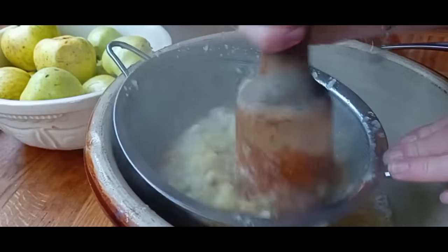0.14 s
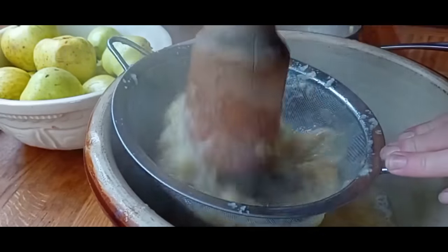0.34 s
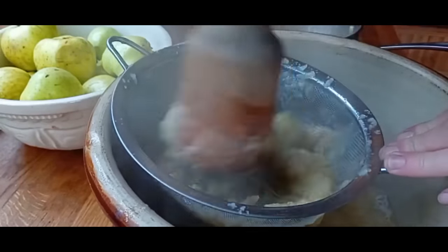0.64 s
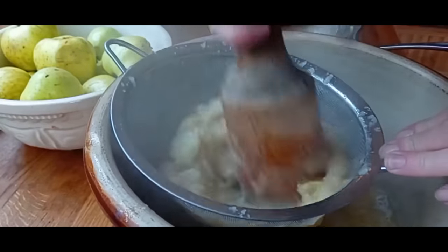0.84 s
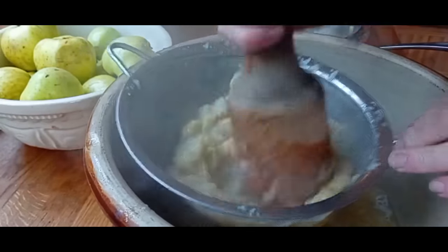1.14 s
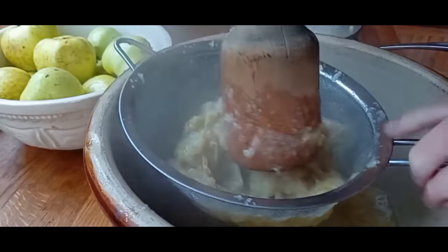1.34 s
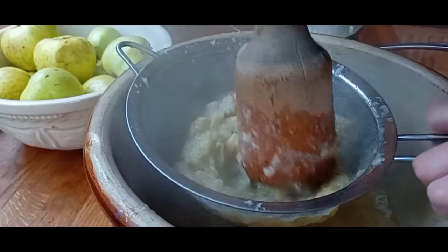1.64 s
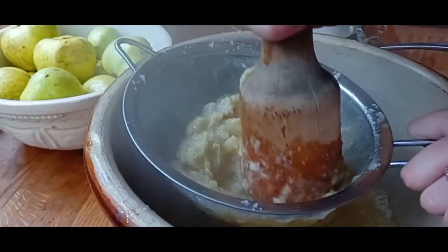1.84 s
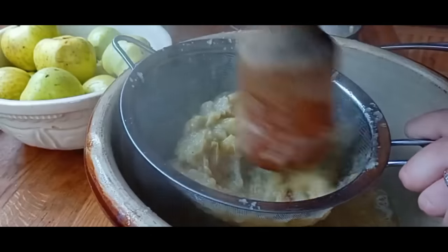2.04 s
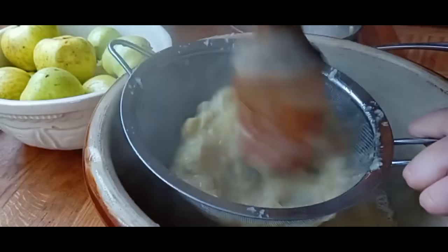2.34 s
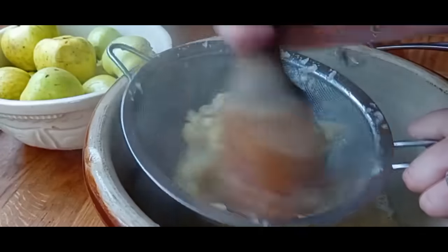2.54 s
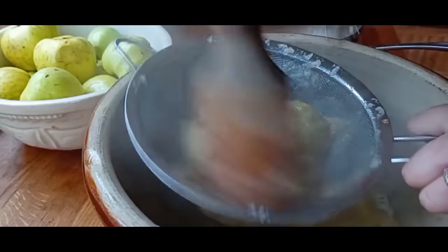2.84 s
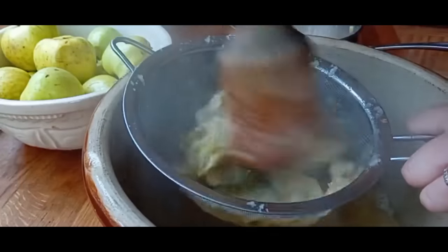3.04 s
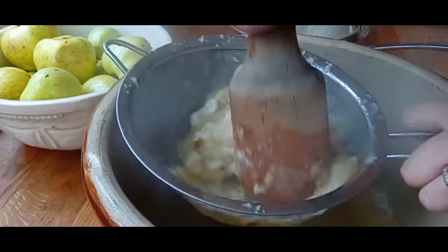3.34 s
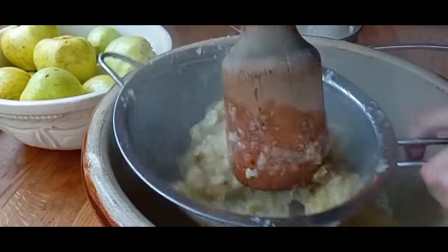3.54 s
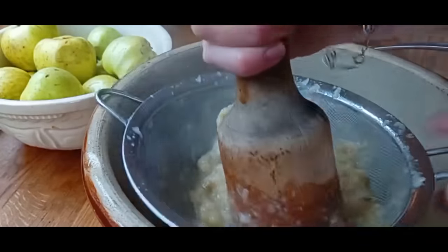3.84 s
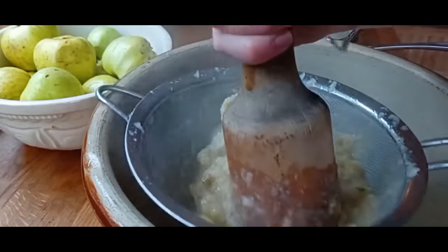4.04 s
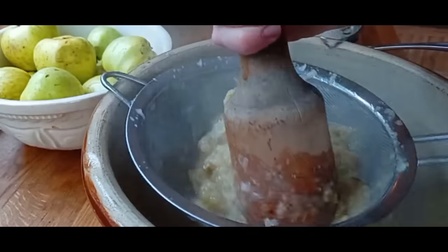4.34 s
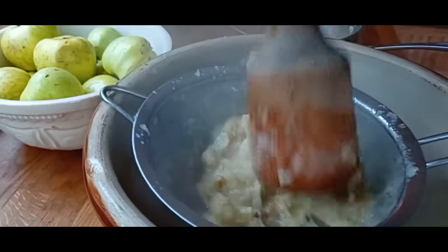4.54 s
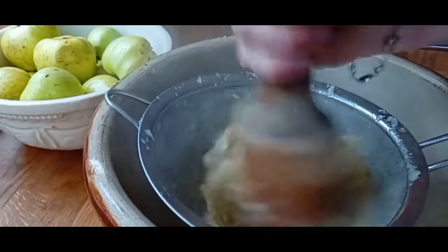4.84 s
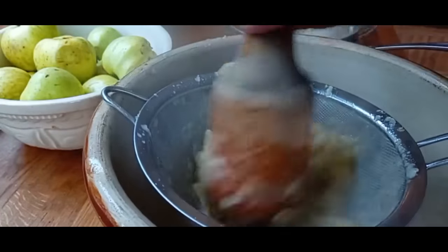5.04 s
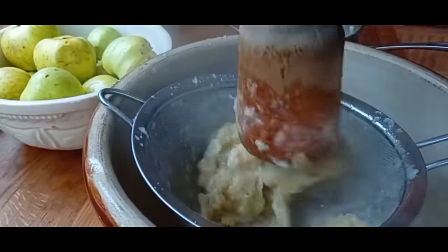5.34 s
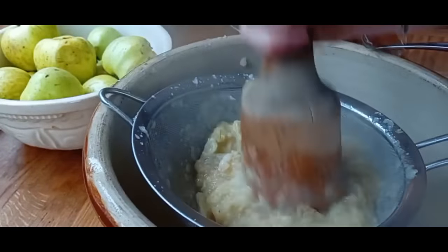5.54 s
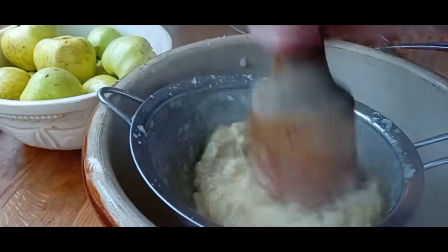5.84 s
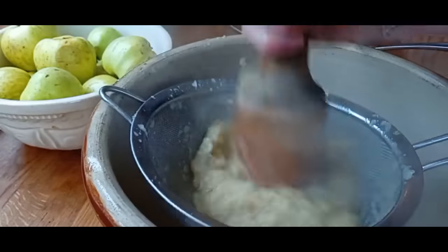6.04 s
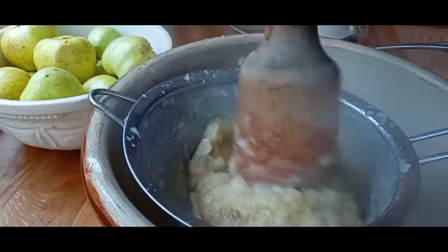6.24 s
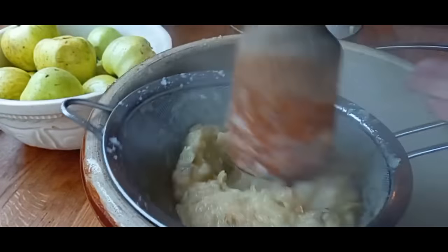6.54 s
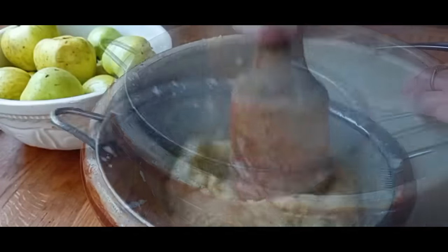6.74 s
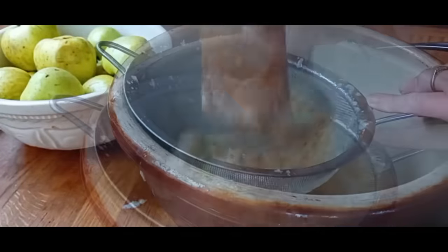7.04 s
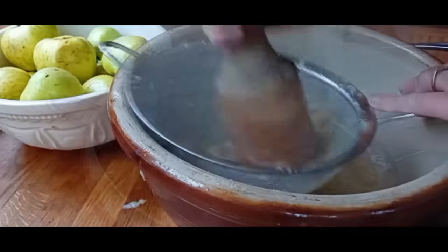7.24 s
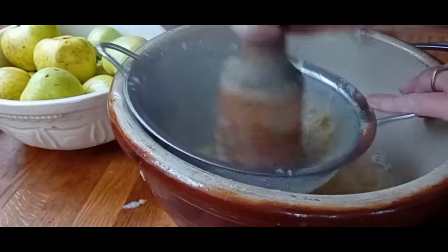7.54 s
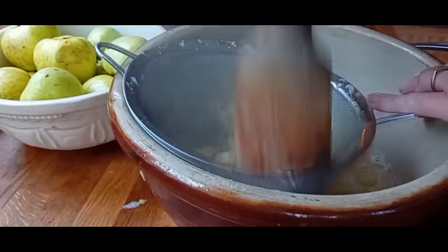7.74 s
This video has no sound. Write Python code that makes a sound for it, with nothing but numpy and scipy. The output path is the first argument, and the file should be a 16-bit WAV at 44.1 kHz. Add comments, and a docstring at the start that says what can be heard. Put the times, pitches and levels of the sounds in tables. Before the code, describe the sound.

A wooden beater mashes wet fruit pulp through a wire sieve, rasping and squishing, with metal taps against a bowl.

```python
"""A wooden beater mashes cooked apple through a wire sieve resting in a big earthenware bowl, in a kitchen.
It starts lightly, pressing and dragging: wood rasps on ringing mesh, air pockets pop and spit, and pulp
squishes in the hollow bowl. After a lull, harder presses come from 2.2 s. Around 4 s the frame grates
and knocks on the rim, and at 4.5 s a shove makes the sieve judder. The work goes on at about three
presses a second and ends on two heavy, juddering pushes."""
import sys
import numpy as np
from scipy import signal
from scipy.io import wavfile

SR = 44100
rng = np.random.default_rng(int(sys.argv[2]) if len(sys.argv) > 2 else 0)


def transcribe(u):
    """Save the signal u as a 16-bit wav file named by the first command-line argument.

    u: samples, shape (n,) or (channels, n), limited to [-1, 1]; the rate is SR.
    q: integer samples, one column per channel.
    """
    v = np.clip(np.atleast_2d(u).T, -1, 1)
    q = np.round(v * 32767).astype(np.int16)
    wavfile.write(sys.argv[1], SR, q)


N = 347943


def from_db(db):
    """Decibels to gain."""
    return 10 ** (np.asarray(db) / 20)


def rms_one(x):
    """Scale to rms 1."""
    return x / np.sqrt(np.mean(x ** 2) + 1e-20)


def at_hz(points, hz):
    """Read a curve on a log-frequency axis."""
    freqs, values = np.transpose(points)
    return np.interp(np.log(hz), np.log(freqs), values)


def passband(x, hz, kind):
    """Second-order Butterworth filter."""
    sos = signal.butter(2, np.clip(hz, 10, SR * .45), kind, fs=SR, output="sos")
    return signal.sosfilt(sos, x + 1e-18)


def bands(low_hz, high_hz):
    """Edges of roughly third-octave bands."""
    edges = np.geomspace(low_hz, high_hz, int(3 * np.log2(high_hz / low_hz)) + 2)
    return zip(edges, edges[1:])


def wander(per_s):
    """Random modulator: glides between values of spread 1."""
    return np.interp(np.arange(N) * per_s / SR, np.arange(3000), rng.standard_normal(3000))


def control_times():
    """Envelope clock, ticking about once a millisecond."""
    return np.linspace(0, N / SR, 8000)


def per_sample(envelope):
    """Bring an envelope up to audio rate."""
    return np.interp(np.arange(N) / SR, control_times(), envelope)


def push_envelope(s, hold_s, rise, sag, release):
    """A push bites fast, eases as the load gives way, then is let go; slopes in dB per second."""
    t = control_times() - s
    db = rise * np.minimum(t, 0) - sag * np.clip(t, 0, hold_s) - release * np.maximum(t - hold_s, 0)
    return from_db(np.maximum(db, -200))


def drag_envelope(s, half_s):
    """A drag swells to a rounded top and falls away."""
    distance = (control_times() - s) / max(half_s, .004)
    return np.exp(1 - np.minimum(np.hypot(1, distance) ** 1.15, 25))


def grains(per_s, spread_db):
    """Tiny random contacts of uneven size, on two channels with strengths of their own."""
    sizes = from_db(spread_db * np.minimum(rng.exponential(1, N), 4))
    return (rng.random(N) < per_s / SR) * sizes * rng.standard_normal((2, N))


# Stereo image of scattered sound: f/Hz, left-right correlation
LIKENESS = [(60, 0.76), (200, 0.96), (400, 0.24), (900, 0.5), (1700, 0.18), (2400, -0.25), (3500, -0.19),
            (16000, 0.067)]
def stereo_band(pair, low, high):
    """One band of two unrelated signals, mixed as mid and side to the width of scattered sound."""
    mid, side = passband(pair, [low, high], "band")
    alike = at_hz(LIKENESS, np.sqrt(low * high))
    return np.sqrt(1 + alike) * mid + np.sqrt(1 - alike) * side * np.array([[1], [-1]])


def texture(excite, spectrum, patchy_db=0):
    """Two excitations feed alternate bands of an EQ curve, each flickering by patchy_db; rms 1."""
    pairs = excite(), excite()
    out = 0
    for k, (low, high) in enumerate(bands(spectrum[0][0], spectrum[-1][0])):
        gain = from_db(at_hz(spectrum, np.sqrt(low * high)) + patchy_db * wander(per_s=68))
        out += gain * stereo_band(pairs[k % 2], low, high)
    return rms_one(out)


def ring(x, modes, shifting_db):
    """Resonator bank: a body's modes, each with a drifting drive and its own left-right phase."""
    out = np.zeros((2, N))
    for hz, db, t60, phase in modes:
        radius = from_db(-60 / (t60 * SR))
        pole = radius * np.exp(2j * np.pi * hz / SR)
        drive = x * from_db(db + shifting_db * wander(per_s=8.5)) + 1e-18
        swing = signal.lfilter([np.sqrt(1 - radius ** 2)], [1, -pole], drive)
        out += [swing.imag, (swing * np.exp(-1j * phase)).imag]
    return out


# Low room resonances: f/Hz, level/dB, t60/s, left-right phase/rad
ROOM_MODES = [(97, -9, 0.13, 0.094), (118.3, 0, 0.092, 0.091), (210.5, -2, 0.91, 0.18),
              (289.4, -3.5, 1, 0.12)]
# EQ of the room's hiss: f/Hz, level/dB
HISS_EQ = [(30, -26.5), (60, -13), (100, -2), (170, -8.5), (290, -14), (450, -20), (1000, -28.5),
           (3000, -30), (7000, -34), (12000, -31.5), (16000, -26)]
def room_tone(drone_db=-66, hiss_db=-63, whine_db=-75, whine_hz=15472):
    """The bed: a wavering drone of faintly stirred room modes, a thin whine and soft hiss."""
    drone = ring(rng.standard_normal(N), ROOM_MODES, shifting_db=2.5)
    drone = rms_one(passband(drone, 82, "high"))
    whine = rms_one(np.sin(2 * np.pi * whine_hz * np.arange(N) / SR))
    hiss = texture(lambda: rng.standard_normal((2, N)), HISS_EQ)
    return from_db(drone_db) * drone + from_db(whine_db) * whine + from_db(hiss_db) * hiss


# Reverb time of the kitchen: f/Hz, t60/s
KITCHEN_DECAY = [(150, 0.28), (500, 0.24), (1400, 0.18), (3700, 0.19), (10000, 0.15), (16000, 0.018)]
def reflections(x, t60s=KITCHEN_DECAY, predelay_s=.0053, size=22000):
    """Dense echoes that die away band by band; the kitchen's by default."""
    t = np.arange(size) / SR
    white = rng.standard_normal((2, 2, size)) * (t > predelay_s)
    tail = sum(stereo_band(white[k % 2], low, high) * from_db(-60 * t / at_hz(t60s, low))
               for k, (low, high) in enumerate(bands(100, 17000)))
    return signal.oaconvolve(x, rms_one(tail) / np.sqrt(size), axes=1)[:, :N]


# Low swells: centre t/s, half length/s, f/Hz, level/dB
HUMS = [(0.193, 0.011, 200, -62), (1.912, 0.026, 100, -55), (2.006, 0.014, 96.5, -50),
        (2.482, 0.012, 290, -48.5), (3.143, 0.015, 289, -46.5), (3.35, 0.013, 108, -44.5),
        (3.578, 0.021, 106, -51), (3.74, 0.0084, 130, -46), (4.193, 0.035, 97, -52.5),
        (4.576, 0.019, 210, -47), (4.719, 0.026, 102, -47), (5.214, 0.011, 212, -50.5),
        (5.52, 0.028, 217, -48), (6.116, 0.048, 97, -57), (5.775, 0.011, 477, -42),
        (6.161, 0.017, 471, -44.5)]
def hums(size=4000):
    """Bowl and table hum in brief, low notes that swell and fade."""
    t = np.arange(-size, size) / SR
    out = np.zeros(N + 2 * size)
    for s, half_s, hz, db in HUMS:
        start = int(s * SR)
        swell = from_db(db) * np.exp(-.5 * (t / half_s) ** 2)
        out[start:start + 2 * size] += swell * np.sin(2 * np.pi * (hz * t + rng.random()))
    return np.sqrt(2) * out[size:-size]


# Hard pushes on the rim: t/s, hold/s, level/dB
SHOVES = [(2.609, .005, -48.5), (2.726, 0.014, -43), (2.936, 0.018, -44.5), (3.061, 0.031, -47),
          (3.278, 0.058, -49.5), (4.493, 0.064, -25.5), (4.704, 0.063, -67), (5.49, 0.08, -47.5),
          (6.882, 0.028, -46.5), (6.942, 0.078, -43.5), (7.218, 0.095, -42), (7.468, 0.091, -31.5),
          (7.809, .08, -34)]
# EQ of the judder's rumble: f/Hz, level/dB
JUDDER_EQ = [(30, -33), (60, -10.5), (110, 3), (170, 4.5), (230, 2.5), (310, 0), (420, -18)]
def judder(squeeze, rumble_db=-2, throb_db=-6, slip_hz=190, unsteady=.27, squeeze_db=-26):
    """The loaded sieve sticks and slips on the rim in an uneven rhythm, shaking bowl and table."""
    shoves = sum(from_db(db) * push_envelope(s, hold_s, rise=2794, sag=42.5, release=390)
                 for s, hold_s, db in SHOVES)
    load = from_db(squeeze_db) * squeeze + per_sample(shoves)
    slip_rate = slip_hz * np.exp(unsteady * wander(per_s=90))
    throb = np.sin(2 * np.pi * np.cumsum(slip_rate) / SR)
    rumble = texture(lambda: grains(per_s=2100, spread_db=-6), JUDDER_EQ)
    return load * (from_db(throb_db) * throb + from_db(rumble_db) * rumble)


# Air modes of the bowl: f/Hz, level/dB, t60/s, left-right phase/rad
BOWL_MODES = [(295, -4, .22, .2), (335, -7, .14, .4), (372, -2, .15, .3), (460, -1.5, .11, .3),
              (500, -5, .1, .4), (590, -3.5, .09, .3), (775, -9, .07, .5), (908, -2, .1, .4),
              (1015, -8, .07, .5)]
def bowl_hollow(x):
    """The air in the bowl resonates and gives the wet sounds a hollow body."""
    return ring(x.mean(axis=0), BOWL_MODES, shifting_db=5)


# Modes of frame and basket: f/Hz, level/dB, t60/s, left-right phase/rad
SIEVE_MODES = [(1249, -6, .12, .3), (1320, -11, .06, .3), (1416, -9, .08, .3), (1917, -8, .04, 1.2),
               (2310, 7, .09, 2.8), (2365, 5, .06, 2.9), (2450, 5.5, .07, 2.6), (2850, -9, .04, 1.2),
               (3575, -.5, .08, 2.0), (3640, -3.5, .04, 2.0), (4870, -6, .05, -1.5), (5460, -4, .05, 1.5),
               (5690, -3.5, .045, 1.0), (6090, -4.5, .05, -1.0), (6750, -3, .04, 1.5)]
# Automation of the rubbed sieve's middle modes: t/s, level/dB
MIDDLE_RING = [(0.3, 6), (2.7, 9), (3.5, 5.5), (3.9, -3), (4.17, 0), (4.4, 3), (7.0, 1.5)]
def rubbed_sieve(force):
    """Rubbing rings the sieve's modes, more or less as the contact point moves."""
    middle_gain = from_db(np.interp(np.arange(N) / SR, *np.transpose(MIDDLE_RING)))
    drive = force + (middle_gain - 1) * passband(force, [3200, 4050], "band")
    return ring(drive, SIEVE_MODES, shifting_db=4.5)


# Frame hits on the rim: t/s, then level/dB of the low, middle and high modes
KNOCKS = [(0.505, -39.5, -37, -56), (1.2632, -37.5, -35, -36), (1.395, -48.5, -47, -53),
          (1.501, -41.5, -47, -43.5), (1.517, -52, -59, -55), (1.673, -50.5, -68, -82),
          (1.8022, -39, -48, -43), (2.357, -34, -32, -39), (3.707, -31, -40, -37), (3.827, -31, -26, -36),
          (3.834, -43, -48, -41), (3.892, -42, -26, -44), (4.176, -37, -50, -49),
          (4.493, -33.5, -30, -30.5), (4.519, -41, -44, -39), (6.879, -45, -41, -45),
          (6.9376, -37, -35, -37.5), (7.02, -40, -44, -47), (7.379, -49, -50, -54)]
KNOCK_BANDS_HZ = 2850, 3600, 4800
def knocks(knock_db=3, click_db=-5, contact_s=.00038, choke_s=.0039, tail_db=-12, size=7000):
    """Steel clicks on glaze; hand and pulp choke the modes to a faint ring, detuned on each hit."""
    out, t = np.zeros((2, N + size)), np.arange(size) / SR
    attack, choke = 1 - np.exp(-t / contact_s), np.exp(-t / choke_s)
    for s, *levels in KNOCKS:
        colour = list(zip(KNOCK_BANDS_HZ, levels))
        click = 2 * passband(rng.standard_normal((2, size)) * choke, [900, 7000], "band")
        clank = from_db(click_db + levels[0]) * click
        for hz, db, t60, phase in SIEVE_MODES:
            detune, turn, linger = rng.standard_normal(3)
            fade = choke + from_db(tail_db + 2 * linger - 60 * t / t60)
            angle = 2 * np.pi * (hz * (1 + .006 * detune) * t + turn)
            clank += from_db(db + at_hz(colour, hz)) * fade * np.sin([angle, angle - phase])
        start = int(s * SR)
        out[:, start:start + size] += clank * attack
    return from_db(knock_db) * out[:, :N]


def basket_flex(ringing, flex_s=.000024, chatter_db=2.5):
    """The basket flexes and chatters under the beater, so its ring wavers in pitch and level."""
    n = np.arange(N)
    bent = n + flex_s * SR * wander(per_s=70)
    chatter = rms_one(from_db(chatter_db * wander(per_s=170)))
    return np.array([np.interp(bent, n, side) for side in ringing]) * chatter


# The beater comes down or bumps the sieve: t/s, hold/s, then level/dB of rasp, fizz and squish
PRESSES = [(0.158, .018, -39.5, -45, -56), (0.513, .08, -45, -58.5, -52.5), (0.804, .032, -37, -41.5, -40),
           (1.094, .1, -42, -44.5, -52), (1.257, .019, -44, -58, -41.5), (1.501, .015, -54.5, -74.5, -45),
           (2.224, 0.16, -32.5, -39, -33.5), (2.34, .035, -38.5, -45, -34),
           (2.559, 0.032, -39.5, -43, -41.5), (2.679, .12, -33.5, -41.5, -30),
           (2.898, 0.024, -34.5, -39.5, -35.5), (3.046, .013, -40.5, -49, -30.5),
           (3.243, .014, -35.5, -38, -43.5), (3.394, .003, -47, -66.5, -53), (4.494, .15, -34, -46, -34.5),
           (4.857, 0.054, -36, -38.5, -51), (5.171, .05, -34.5, -39.5, -39),
           (5.434, .064, -37.5, -46.5, -39.5), (5.737, .031, -34.5, -43.5, -40),
           (6.043, .18, -33, -41, -45.5), (6.362, .045, -34, -40, -26), (6.69, 0.18, -36.5, -43, -45.5),
           (6.939, .13, -41, -49.5, -37.5), (7.153, .19, -41, -53.5, -36),
           (7.194, .029, -32.5, -39.5, -33.5), (7.469, .17, -32.5, -35, -27),
           (7.799, .063, -31, -44, -29.5)]
# It is dragged round: centre t/s, half length/s, then level/dB of scrape, fizz and squish
DRAGS = [(0.224, 0.032, -40, -63.5, -46), (0.48, 0.012, -47, -58.5, -56), (0.561, 0.015, -61, -56, -49),
         (0.648, 0.068, -58, -62, -93), (0.883, 0.025, -47.5, -63, -52), (1.191, 0.035, -41.5, -62, -42),
         (2.034, 0.02, -58.5, -74, -56.5), (2.349, 0.016, -38, -45, -32), (2.7, 0.045, -34, -46.5, -42.5),
         (2.99, 0.049, -36, -54, -40.5), (3.351, 0.012, -31, -47.5, -35), (3.603, 0.045, -46.5, -59.5, -40),
         (3.822, 0.033, -28, -41.5, -35.5), (4.164, 0.042, -41.5, -58.5, -43.5),
         (4.313, 0.024, -45, -60, -57), (4.402, 0.033, -48, -71, -41), (4.952, 0.05, -52.5, -57, -79.5),
         (5.16, 0.01, -43, -59.5, -61), (5.27, 0.025, -46.5, -55, -54), (5.562, 0.025, -47, -58.5, -47.5),
         (5.854, 0.024, -47, -57, -49.5), (6.491, 0.045, -36.5, -46, -45.5),
         (6.659, 0.039, -44.5, -61, -49.5), (6.797, 0.01, -28, -46, -33), (6.846, 0.024, -33, -45, -34.5),
         (7.033, 0.012, -39.5, -43, -38), (7.324, 0.021, -34.5, -44.5, -47),
         (7.628, 0.011, -44.5, -44, -59)]
def beater_strokes():
    """Envelopes of rasp, fizz and squish; presses drive all three, drags add power to the last two."""
    presses = [push_envelope(s, hold_s, rise=2206, sag=155, release=399) for s, hold_s, *_ in PRESSES]
    drags = [drag_envelope(s, half_s) for s, half_s, *_ in DRAGS]
    power = from_db([row[2:] for row in PRESSES]).T ** 2 @ np.square(presses)
    power[1:] += from_db([row[3:] for row in DRAGS]).T ** 2 @ np.square(drags)
    return [per_sample(gain) for gain in np.sqrt(power)]


# The frame slides on the rim: centre t/s, level/dB, half length/s
RIM_SLIDES = [(3, -58, 0.0022), (3.51, -57, 0.044), (3.566, -62, 0.01), (3.619, -54, 0.0065),
              (3.672, -56, 0.0064), (3.813, -36.5, 0.013), (4.114, -50, 0.033), (4.166, -44, 0.0082),
              (4.215, -44, .004), (4.38, -48.5, 0.006), (4.509, -38, 0.012), (4.574, -51.5, 0.0051),
              (4.623, -60.5, 0.019), (6.459, -41, 0.0036), (6.84, -47, 0.02), (7.029, -39.5, 0.0084),
              (7.185, -44, 0.017), (7.46, -33, 0.0028), (7.51, -34, 0.012), (7.832, -41.5, 0.018),
              (7.882, -37, 0.0015)]
# EQ of the scrape: f/Hz, level/dB
SCRAPE_EQ = [(700, 3), (1000, 11), (1500, 0), (1900, 5), (2350, 9), (3000, 6), (3600, 2), (4300, 8),
             (5700, 7), (6800, 16.5), (8500, -18.5)]
def grating(force_db=-4.5, drag_force_db=-10, drag_scrape_db=-6, rim_scrape_db=-8):
    """Steel catches on glaze, wood on mesh: gives the force that rings the sieve, and the dry scrape."""
    t = np.arange(N) / SR
    slides = sum(from_db(db) * np.exp(-.5 * np.minimum(((t - s) / max(half_s, .002)) ** 2, 100))
                 for s, db, half_s in RIM_SLIDES)
    drags = per_sample(sum(from_db(db) * drag_envelope(s, half_s) for s, half_s, db, *_ in DRAGS))
    catching = rms_one(from_db(2.5 * wander(per_s=380)))
    grit = rms_one(passband(grains(per_s=2300, spread_db=1)[0], 1100, "high"))
    scrape = texture(lambda: grains(per_s=1800, spread_db=1), SCRAPE_EQ, patchy_db=2)
    force_gain = from_db(force_db) * (slides + from_db(drag_force_db) * drags)
    scrape_gain = from_db(rim_scrape_db) * slides + from_db(drag_scrape_db) * drags
    return catching * force_gain * grit, catching * scrape_gain * scrape


# EQ of the squish: f/Hz, level/dB
SQUISH_EQ = [(280, -13), (380, 1), (480, 9), (620, 5.5), (750, -6), (950, 7), (1200, -6), (1600, -5)]
def pulp(squeeze, squish_db=-4.5):
    """Soft, low bubbles collapse in the squeezed mash."""
    squish = texture(lambda: grains(per_s=2500, spread_db=2), SQUISH_EQ, patchy_db=4.5)
    return squeeze * from_db(squish_db) * squish


# EQs of wood on wire and of wet fizz: f/Hz, level/dB
RASP_EQ = [(900, 23.5), (1300, -4), (1800, 3.5), (2400, 12.5), (3000, 16.5), (4200, 9), (6000, 17),
           (7200, 11), (8500, -35)]
FIZZ_EQ = [(6500, -42), (8000, -38.5), (10000, 26.5), (11500, -0.5), (13000, 1.5), (16000, -21)]
def mesh(rasp, fizz, rasp_db=-6, fizz_db=-2, grit_db=8, flicker_cap=1.7):
    """Wood catches and slips from wire to wire while wet pulp fizzes through the holes."""
    wires = texture(lambda: grains(per_s=1900, spread_db=-.5), RASP_EQ, patchy_db=-.5)
    juice = texture(lambda: grains(per_s=2300, spread_db=-2.5), FIZZ_EQ, patchy_db=3)
    # the random flicker is capped so the rasp has no stray loud cracks
    flicker = from_db(grit_db * np.minimum(wander(per_s=98), flicker_cap))
    return (rasp * from_db(rasp_db) * wires + fizz * from_db(fizz_db) * juice) * flicker


def bubble(t, hz, life_cycles, lag_s, rise_per_cycle=.008):
    """A cavity swells into its note, chirps up as it opens and dies; left and right lie a hair apart."""
    cycles = np.maximum(t + lag_s * np.array([[1], [-1]]), 0) * hz
    envelope = (1 - np.exp(-2 * cycles)) * np.exp(-cycles / life_cycles)
    return envelope * np.sin(2 * np.pi * cycles * (1 + rise_per_cycle * cycles))


def random_onsets(density, count):
    """Random sample positions, crowding where the density is high."""
    work = np.cumsum(density)
    return np.searchsorted(work, rng.random(count) * work[-1])


def gurgle(rasp, gurgle_db=3, spread_db=5.5, pitch_hz=2500, octaves=.88, size=900, count=400):
    """Presses squeeze out wet bubbles that each ring for a few cycles."""
    out, t = np.zeros((2, N + size)), np.arange(size) / SR
    for i in random_onsets(np.sqrt(rasp), count):
        loud, pitch, lag = np.clip(rng.standard_normal(3), -2, 1.6)
        hz = min(pitch_hz * 2 ** (octaves * pitch), SR / 5)
        note = bubble(t, hz, life_cycles=7, lag_s=.00006 * lag)
        out[:, i:i + size] += rasp[i] * from_db(gurgle_db + spread_db * loud) * note
    return out[:, :N]


def small_pockets(rasp, fizz, spit_db=-7, spread_db=3, pitch_hz=3000, octaves=.84, count=60):
    """Cues for small pockets that burst at random, their level riding on the stroke."""
    cues = []
    for i in random_onsets((rasp * fizz) ** .25, count):
        soft, pitch, dryness = rng.standard_normal(3)
        pop_level = 20 * np.log10(rasp[i]) - spread_db * soft
        spit_level = 20 * np.log10(fizz[i]) + spit_db - spread_db * dryness
        hz = min(pitch_hz * 2 ** (octaves * pitch), SR / 4)
        cues.append((i / SR, pop_level, hz, spit_level))
    return cues


# Big air pockets bursting: t/s, pop level/dB, f/Hz, spit level/dB
BIG_POCKETS = [(0.134, -41, 2980, -41), (0.1534, -27.5, 4500, -26), (0.171, -29.5, 587, -73),
               (0.173, -35.5, 2560, -50), (0.2835, -43, 2700, -52), (0.463, -45.5, 2380, -60),
               (0.485, -43.5, 4700, -44), (0.5037, -33, 607, -73), (0.663, -45, 2760, -66),
               (0.761, -41, 6560, -32), (0.778, -32.5, 4300, -30), (0.806, -31.5, 4300, -36),
               (0.8085, -29.5, 2400, -20.5), (0.811, -45, 1060, -31), (1.1024, -31, 527, -63),
               (1.105, -39.5, 2320, -39), (1.133, -58, 4940, -48), (1.116, -38.5, 720, -40),
               (1.2654, -43.5, 660, -37), (2.2195, -41, 980, -36), (2.2243, -28.5, 2680, -37),
               (2.2318, -31, 4470, -23), (2.24, -34, 4380, -25.5), (2.259, -35, 2850, -23),
               (2.345, -47, 1210, -38), (2.358, -33, 910, -32), (2.559, -31.5, 4200, -26.5),
               (2.573, -32, 2700, -35), (2.5857, -32, 3170, -28.5), (2.5957, -35.5, 595, -40),
               (2.6994, -21.5, 1100, -22), (2.7406, -32.5, 910, -47), (2.8922, -40, 4730, -28.5),
               (2.9006, -30.5, 4150, -31), (2.9141, -26, 598, -21.5), (3.0449, -23, 1117, -25.5),
               (3.089, -39, 935, -65), (3.1272, -36.5, 5680, -72), (3.1927, -37.5, 1790, -69),
               (3.223, -35, 2500, -34), (3.2275, -31.5, 2570, -48), (3.251, -28.5, 4900, -26.5),
               (3.257, -24, 628, -60), (3.396, -33.5, 514, -78), (3.828, -38, 1035, -50),
               (3.8375, -30, 586, -50), (4.4904, -26, 335, -63), (4.494, -37, 2720, -28),
               (4.852, -38, 5100, -29.5), (4.8655, -34, 3420, -28.5), (4.874, -36, 4020, -44),
               (4.8801, -45, 5900, -31), (4.887, -39, 3340, -35), (5.1635, -33, 1550, -44),
               (5.172, -27, 3030, -29.5), (5.436, -34.5, 930, -44), (5.4525, -42, 1740, -42),
               (5.477, -39, 1960, -35.5), (5.5133, -42.5, 1930, -73), (5.7064, -54, 3770, -42),
               (5.735, -34.5, 5350, -32.5), (5.7452, -40, 2250, -26), (5.7478, -28.5, 3980, -41),
               (6.0412, -49, 5470, -30), (6.0528, -36, 2070, -34), (6.064, -32, 1930, -57),
               (6.0675, -35, 3030, -33), (6.0725, -30, 3800, -37), (6.078, -32, 2010, -39),
               (6.088, -40, 4000, -28), (6.127, -40.5, 6460, -49), (6.3566, -20.5, 586, -24),
               (6.378, -23.5, 710, -44), (6.385, -26, 2140, -34), (6.697, -34.5, 1990, -44),
               (6.703, -33, 4640, -30), (6.8137, -31, 613, -36), (6.8355, -30, 700, -39),
               (6.9477, -34.5, 6100, -34.5), (7.199, -23.5, 5360, -18), (7.2185, -29, 2340, -46),
               (7.223, -27, 3500, -38), (7.458, -29, 820, -67), (7.4625, -27.5, 3700, -15.5),
               (7.4655, -30, 1470, -31), (7.5075, -37, 2380, -29), (7.5308, -26.5, 3740, -30),
               (7.5477, -40.5, 5900, -34), (7.633, -32, 5460, -31), (7.6477, -37.5, 4500, -32.5),
               (7.8005, -29, 3170, -20.5), (7.803, -24, 1360, -41)]
def pops(cues, crack_db=-8, crack_s=.0016, foam_db=-7, foam_s=.003, foam_octaves=.624,
         spit_s=.002, snap_db=-3, snap_hz=10000, lag_s=.00003, pan_db=.5, size=1300):
    """A pocket bursts: its cavity rings, the film cracks, foam breaks around it and droplets spit."""
    lead = size // 4
    out, t = np.zeros((2, N + size)), (np.arange(size) - lead) / SR

    def fade(decay_s):
        """Steep attack, exponential decay."""
        return np.exp(-np.where(t > 0, t, -8 * t) / decay_s)

    def levelled(burst):
        """Scale to rms 1 over the first 4 ms."""
        return burst / np.sqrt(np.mean(burst[:, (t >= 0) & (t < .004)] ** 2) + 1e-20)

    for s, pop_db, hz, spit_db in cues:
        # a small pocket buried in the pulp hardly spits and rings longer and purer
        buried = np.clip((pop_db - spit_db - 12) / 12, 0, 1) * (hz > 1500)
        life_cycles = 1 + 4.5 * buried
        cavity = levelled(bubble(t, hz, life_cycles, lag_s * rng.standard_normal()))
        film = rng.standard_normal(size) + rng.standard_normal((2, size))
        crack = levelled(passband(film * fade(crack_s), [hz / 2, hz * 2], "band"))
        foam = 0
        for when, pitch, lag in rng.standard_normal((7, 3)):
            foam_hz = min(hz * 2 ** (foam_octaves * pitch), SR / 4)
            foam += bubble(t - foam_s * (when + 1), foam_hz, life_cycles=2.3, lag_s=2 * lag_s * lag)
        foam *= np.linalg.norm(cavity) / (np.linalg.norm(foam) + 1e-9)
        body = cavity + (1 - buried / 2) * (from_db(crack_db) * crack + from_db(foam_db) * foam)
        droplets = rng.standard_normal((2, size)) ** 3
        spray = levelled(passband(droplets * fade(spit_s), 6500, "high"))
        detune, lag, side = rng.standard_normal(3)
        snap = levelled(bubble(t, snap_hz * from_db(detune), life_cycles=1, lag_s=lag_s * lag))
        spit = levelled(spray + from_db(snap_db) * snap)
        pan = from_db(pan_db * side * np.array([[.5], [-.5]]))
        start = int(s * SR) - lead
        out[:, start:start + size] += pan * (from_db(pop_db) * body + from_db(spit_db) * spit)
    return out[:, :N]


def scene(pop_db=-1, wall_db=-6, sieve_pop_db=-29, sieve_rub_db=-21, bowl_db=-20, room_db=-12):
    """The mix: pops bounce off the bowl's wall, sieve and bowl ring, and all spreads into the kitchen."""
    rasp, fizz, squeeze = beater_strokes()
    bubbles = pops(BIG_POCKETS + small_pockets(rasp, fizz)) + gurgle(rasp)
    bursts = from_db(pop_db) * passband(bubbles, 310, "high")  # too small to radiate bass
    rubbing, mash = mesh(rasp, fizz), pulp(squeeze)
    grating_force, scrape = grating()
    wall_t60s = [(300, .06), (14000, .032)]  # f/Hz, t60/s
    wall = from_db(wall_db) * reflections(bursts, wall_t60s, predelay_s=.0017, size=5000)
    sieve_force = grating_force + from_db(sieve_pop_db) * bursts[0] + from_db(sieve_rub_db) * rubbing[0]
    sieve = basket_flex(knocks() + rubbed_sieve(sieve_force))
    hollow = from_db(bowl_db) * bowl_hollow(mash + bursts)
    near = bursts + wall + rubbing + scrape + mash + sieve + hollow + judder(squeeze) + hums()
    return near + from_db(room_db) * reflections(near) + room_tone()


# Peaks and notches of the microphone: f/Hz, width/octaves, level/dB
MICROPHONE_EQ = [(8440, 0.2, -7), (10450, 0.48, 9.5), (12500, 0.27, -18), (15450, .08, -4)]
def record(dry):
    """The small microphone's ports colour the treble; deep bass and the top are cut."""
    for hz, octaves, db in MICROPHONE_EQ:
        w, gain = 2 * np.pi * hz / SR, from_db(db / 2)
        width = np.sin(w) * np.sinh(np.log(2) / 2 * octaves * w / np.sin(w))
        feedforward = [1 + width * gain, -2 * np.cos(w), 1 - width * gain]
        feedback = [1 + width / gain, -2 * np.cos(w), 1 - width / gain]
        dry = signal.lfilter(feedforward, feedback, dry)
    high_cut = signal.ellip(10, .2, 70, 16200, fs=SR, output="sos")
    return signal.sosfilt(high_cut, passband(dry, 34.7, "high"))


dry = scene()
out = record(dry)
transcribe(out)
```